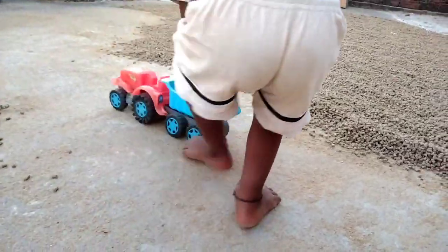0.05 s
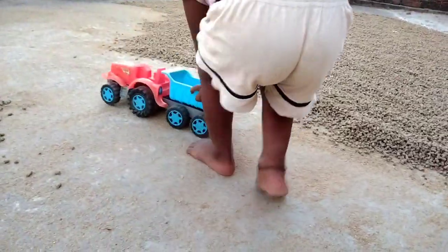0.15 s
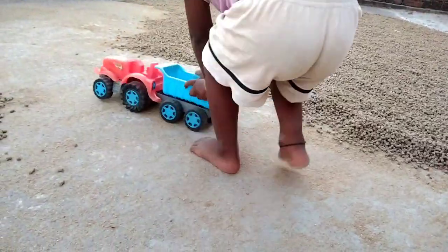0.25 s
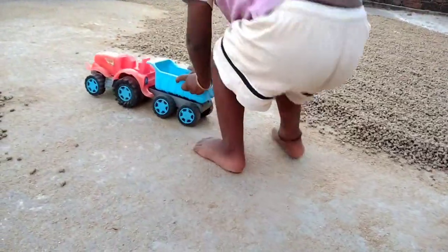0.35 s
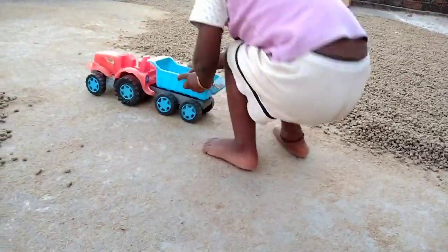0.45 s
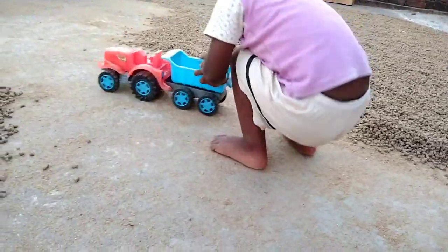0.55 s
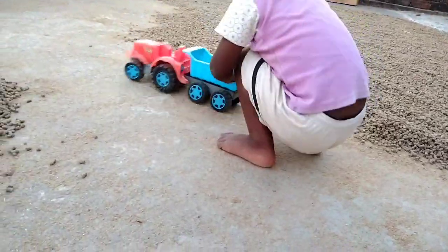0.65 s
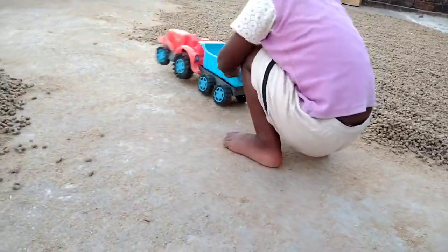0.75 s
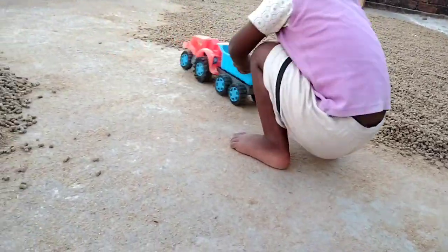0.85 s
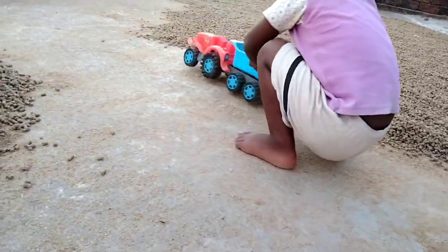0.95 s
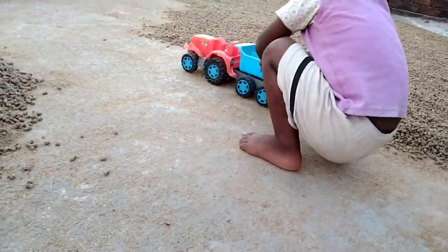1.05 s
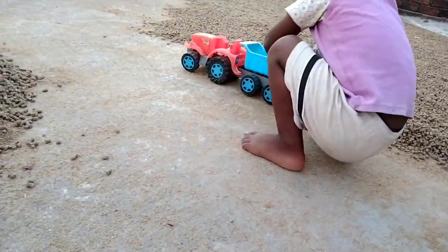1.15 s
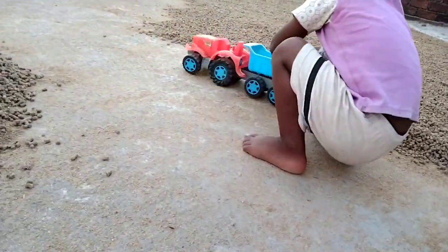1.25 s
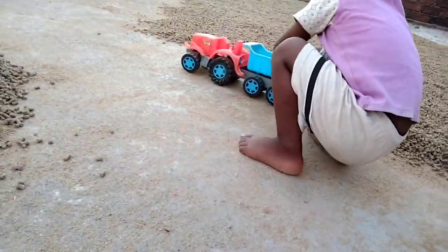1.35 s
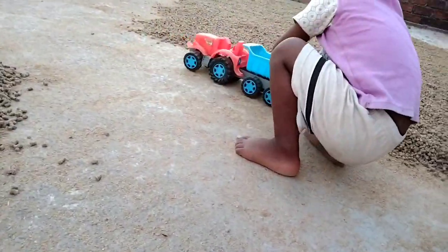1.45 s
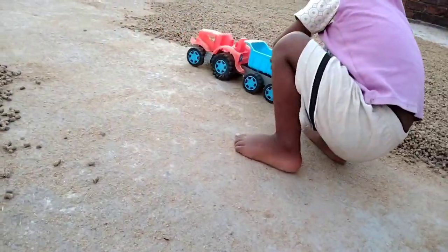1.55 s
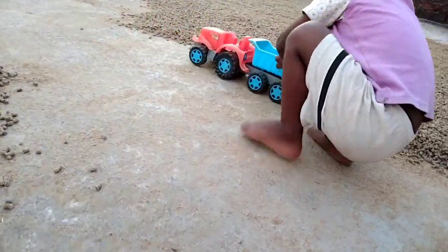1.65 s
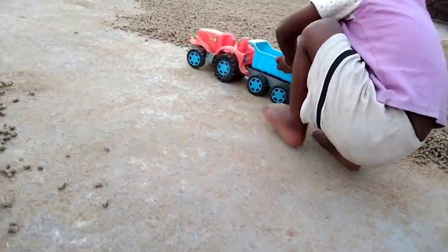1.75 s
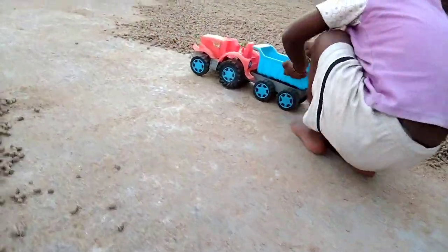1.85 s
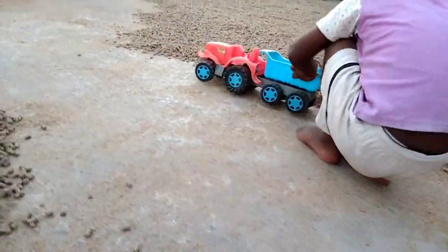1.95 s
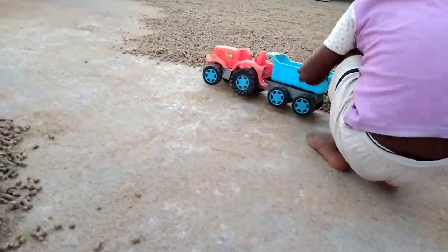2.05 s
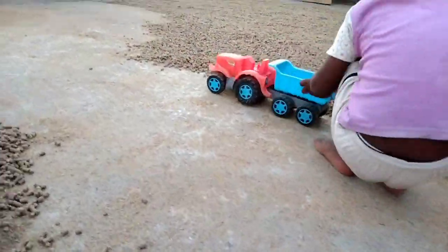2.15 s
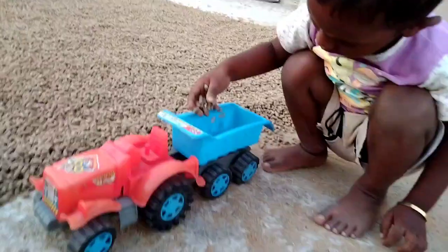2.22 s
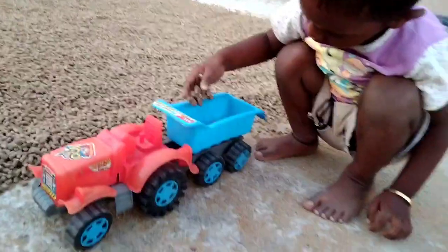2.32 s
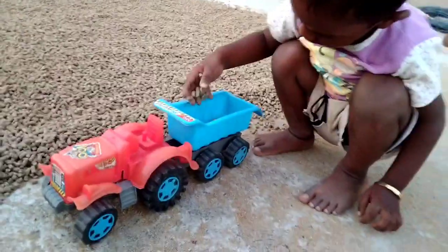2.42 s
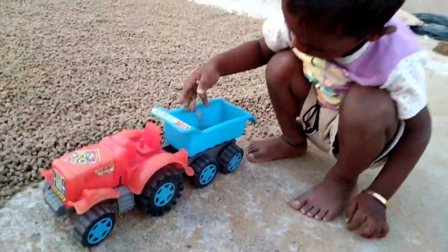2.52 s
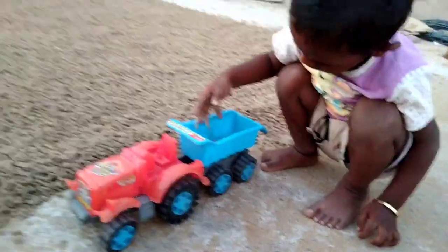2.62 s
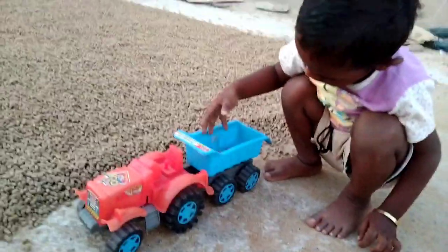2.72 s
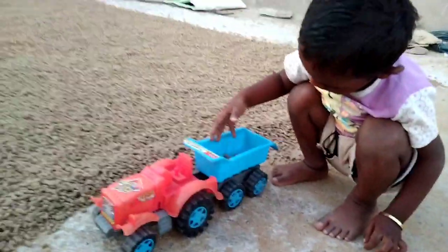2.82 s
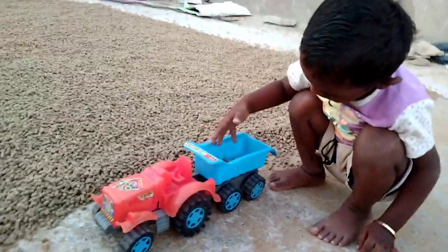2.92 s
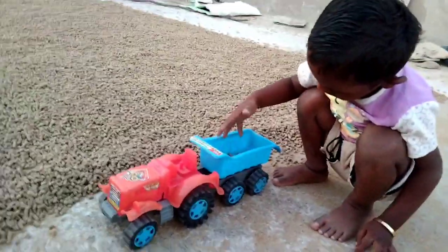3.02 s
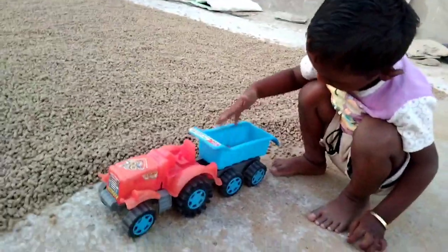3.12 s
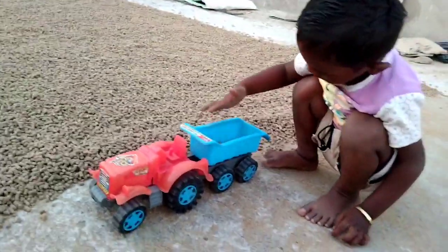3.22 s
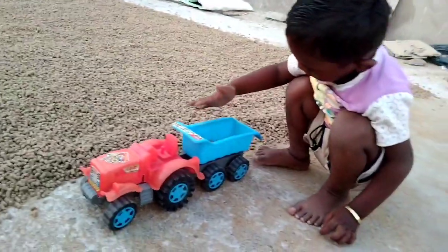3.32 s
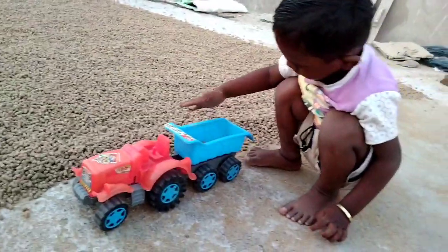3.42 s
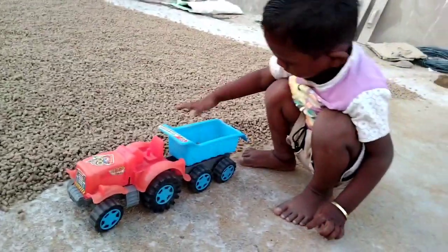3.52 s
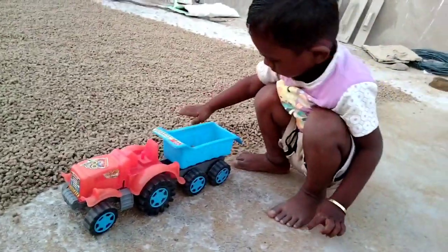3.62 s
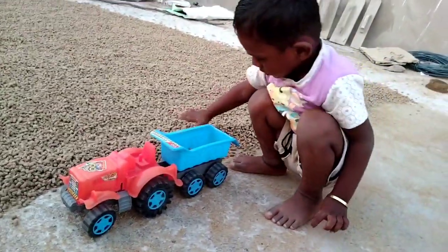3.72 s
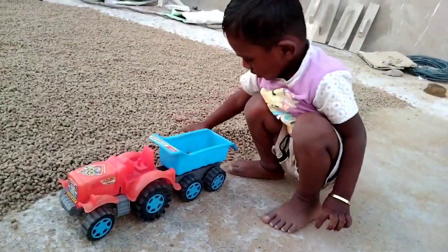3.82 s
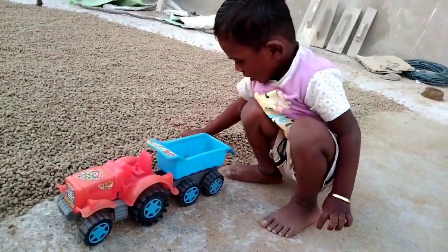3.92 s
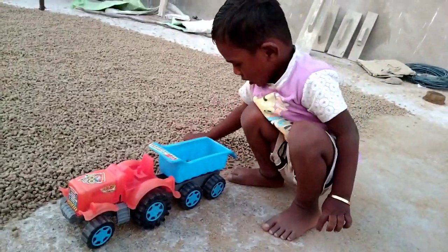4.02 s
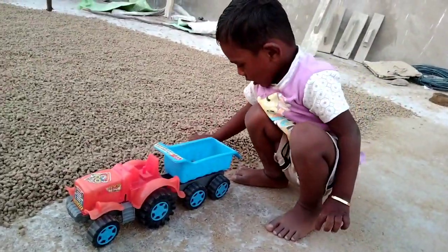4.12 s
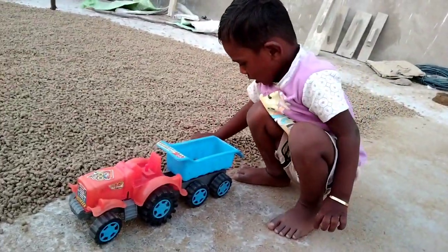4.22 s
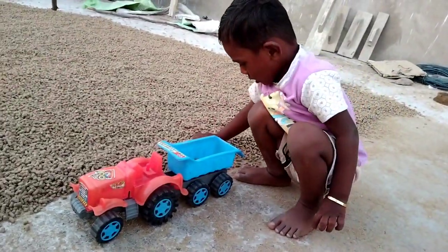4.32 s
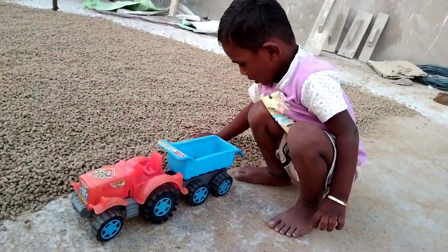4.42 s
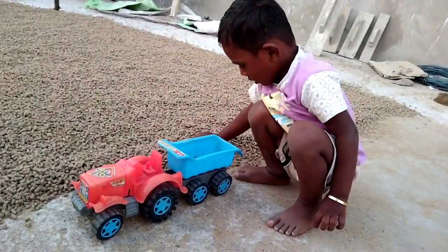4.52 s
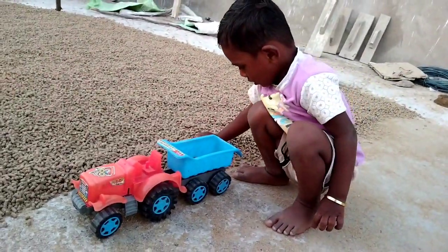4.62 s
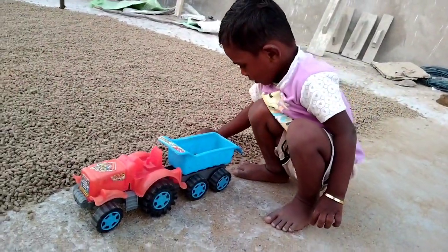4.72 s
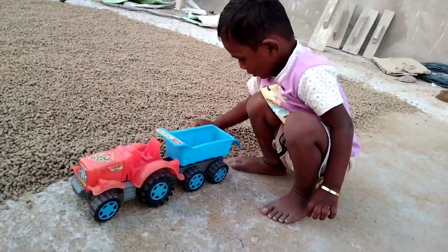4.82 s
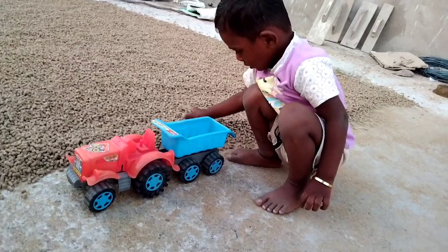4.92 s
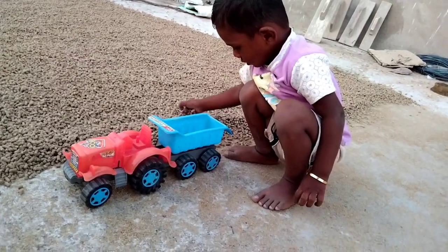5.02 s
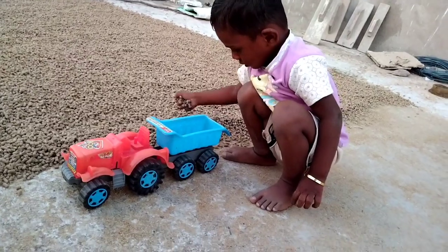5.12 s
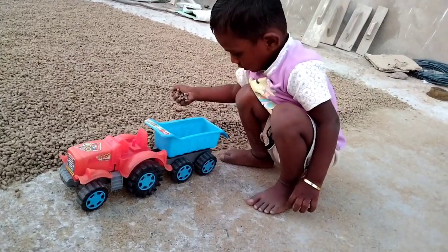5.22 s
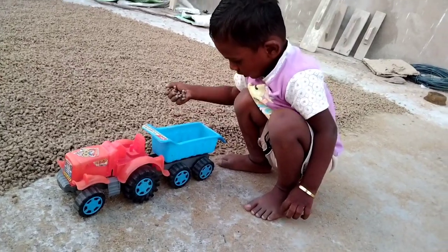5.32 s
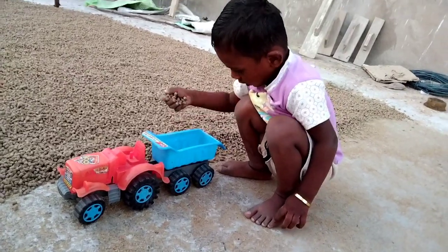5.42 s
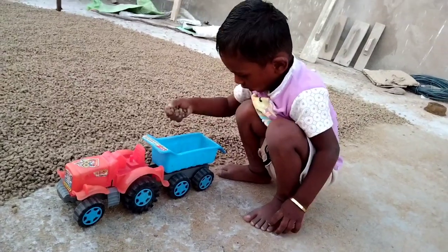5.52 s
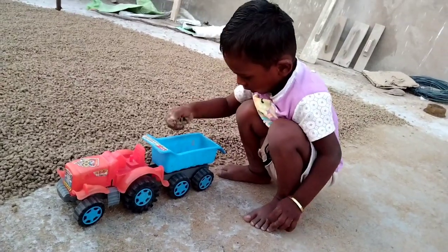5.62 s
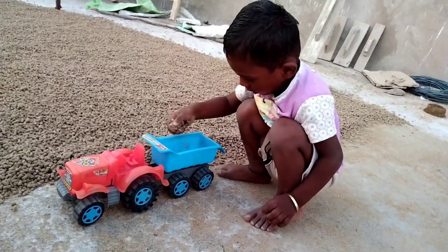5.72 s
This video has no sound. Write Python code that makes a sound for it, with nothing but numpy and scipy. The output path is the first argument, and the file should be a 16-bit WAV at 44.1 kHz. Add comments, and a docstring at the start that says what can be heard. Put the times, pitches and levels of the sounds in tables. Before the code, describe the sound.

In an open concrete yard, a plastic toy tractor and trailer rattles over grit in uneven pushes, jolts and scrapes to a halt. A dull bump leads into a dense clatter of hard pellets in the hollow trailer, thinning out. Faint hand rustling follows while chicks peep and a hen clucks far off; a few last pellets drop. Small mono microphone, close, short echo.

```python
"""First, a plastic toy tractor and trailer rattles over gritty concrete, jolts and knocks to a stop.
Hard pellets then drop into the hollow trailer; a hand rakes the heap and a few more pellets follow.
Toy and pellets are random or listed blows to a few shell modes, with stiff clicks and noisy cracks.
Chicks peep across the yard and a hen clucks far off, all as gliding tones; the yard is a short
decaying echo. One small microphone with a noise suppressor takes it in mono."""
import sys
import numpy as np
from scipy import signal
from scipy.fft import rfft, irfft
from scipy.io import wavfile
from scipy.ndimage import uniform_filter1d

SR = 44100
rng = np.random.default_rng(int(sys.argv[2]) if len(sys.argv) > 2 else 0)


def transcribe(signal):
    """Save signal, clipped to [-1, 1], as a 16-bit WAV file at the path in sys.argv[1]."""
    frames = np.atleast_2d(signal).T
    limited = np.clip(frames, -1, 1)
    pcm = np.round(limited * 32767).astype(np.int16)
    wavfile.write(sys.argv[1], SR, pcm)


N = 254016
TIME = np.arange(N) / SR

# Modes of the hollow plastic shell. Each row: nominal frequency in Hz, level in dB, t60 in s.
SHELL_MODES = [(272, -38.5, 0.004), (328, -40, 0.059), (430, -15, 0.012), (533, -13.5, 0.031),
               (674.6, -11, 0.04), (802, -1, 0.02), (950.4, 2, 0.033), (1073, 3, 0.025), (1300, 3.5, 0.028),
               (1467, 4, .025), (1706, 2.5, 0.018), (2120, -5.5, 0.0096), (2762, -6.5, 0.023),
               (3067, -4, 0.026), (3430, 0.5, 0.014), (3700, -0.5, 0.019), (4260, -1.5, 0.012),
               (4380, -1.5, 0.011)]
CLICK_FROM_HZ = 2000  # modes from here up make the stiff click, those below the ring
# Crack of a hard contact. Each row: frequency in Hz, level in dB.
CRACK_SPECTRUM = [(1500, -32), (4500, -4.5), (5700, 3), (7200, -1), (8500, -12), (10500, -24.5),
                  (13500, -24), (16000, -28)]
# Grit grinding under the wheels. Each row: frequency in Hz, level in dB.
GRIT_SPECTRUM = [(100, -11.5), (400, -12), (2000, 5), (5000, 1), (7000, 0.5), (8500, -11.5), (11000, -15.5),
                 (13300, -8), (15500, -13)]

# Pushes that set the toy rolling. Each row: start in seconds, end in seconds, level at the start in dB,
# level at the end in dB, grittiness in dB.
PUSHES = [(0, 0.145, -34, -34.5, 1.5), (0.142, 0.283, -34.5, -35.5, 3), (0.315, 0.396, -35, -42.5, 4),
          (0.42, 0.575, -39, -36.5, 2.5), (0.629, 0.764, -37.5, -35.5, -1), (0.854, .87, -43, -55, 2.5),
          (0.913, 0.933, -26.5, -37.5, -12.5), (0.997, 1.019, -46, -57, -1),
          (1.093, 1.217, -40.5, -51.5, -1.5), (1.224, 1.416, -54.5, -58.5, -21),
          (1.405, 1.445, -45.5, -43.5, -5), (1.452, 1.576, -40, -38.5, -5.5),
          (1.619, 1.673, -38, -41.5, -3.5), (1.717, 1.78, -49.5, -53.5, -6.5),
          (1.982, 2.1, -52.5, -53.5, -3.5), (2.114, 2.2, -40.5, -45, -5.5)]
PUSH_ATTACK_S, COAST_DB_PER_S = 0.0064, 178  # the rattle starts at once and dies as the toy coasts
# click and crack against the shell ring; grit brightens both
ROLL_CLICK_DB, ROLL_CRACK_DB, ROLL_CRACK_PER_GRIT = -8, -9, 0.57
# Low thrum of the hollow wheels. Each row: frequency in Hz, level in dB.
THRUM_SPECTRUM = [(40, -19.5), (90, -4), (200, -5), (330, -1.5), (520, 5.5), (750, -3), (3000, -66.5)]

# A wheel jumps over a larger grain. Each row: start in seconds, level in dB,
# hardness (click over ring) in dB.
GRAIN_JUMPS = [(0.0502, -38, 0), (0.0704, -31, -6), (.117, -31.5, -5), (0.1294, -32.5, 1),
               (0.243, -29.5, 8), (0.248, -33.5, -4), (0.2732, -32.5, 4), (0.3409, -33.5, 5),
               (0.4748, -29, 1), (.5845, -40, -21), (0.6373, -28, -9.5), (0.701, -30, -8),
               (0.7503, -31, -4.5), (0.7627, -28.5, -1), (0.7873, -32.5, -5.5), (.8884, -49.5, 8),
               (1.0397, -52, -1), (1.2337, -47, -13), (1.4636, -33.5, -9.5), (1.4744, -33.5, -1),
               (1.515, -53, 3), (1.5389, -32.5, -6), (1.6449, -39.5, -1), (1.9824, -51, -14),
               (2.1509, -44.5, 2)]
JUMP_CRACK_DB, JUMP_SOFT_DB = -15.5, 6  # crack against the blow; softness in dB per octave

# The whole toy jolts on the concrete. Each row: start in seconds, level in dB before the common
# knock gain, softness in dB per octave.
JOLTS = [(0.9172, -36.5, 4), (0.9207, -32, 17), (0.9231, -27, 17), (.9441, -38.5, 23), (1.1066, -41, 16.5),
         (2.1053, -40, 13), (4.762, -68, 7.5)]
JOLT_HARD_DB, JOLT_CRACK_DB = -8, -14.5  # click over ring; crack against the blow

# Chicks across the yard, one row a peep. Each row: start in seconds, length in seconds, top pitch in Hz,
# end pitch in Hz, level in dB before the common peep gain, all harmonics but the second in dB.
PEEP_NOTES = [(1.178, .028, 1780, 1656, -44, 0), (1.208, 0.023, 1750, 1574, -39, -3),
              (1.23, 0.059, 1610, 1524, -44.5, -3), (1.287, 0.084, 1580, 1510, -58.5, -11),
              (1.679, .09, 1760, 1470, -54, -4), (1.98, 0.1, 1750, 1587, -56, -1.5),
              (2.04, 0.053, 1760, 1590, -56.5, -1), (2.06, 0.049, 1690, 1580, -58, -1.5),
              (2.939, 0.097, 1482, 1383, -58, 2), (3.04, 0.035, 1520, 1410, -55.5, 6.5),
              (3.102, 0.0388, 1520, 1340, -69, 7), (3.191, 0.081, 1485, 1475, -69, 7.5),
              (3.31, 0.062, 1735, 1493, -51.5, 0.5), (3.447, 0.029, 1590, 1430, -58, -5),
              (3.873, 0.071, 1790, 1510, -56, 3), (3.949, 0.031, 1780, 1417, -53.5, -2.5),
              (3.979, 0.051, 1700, 1480, -51, -7), (4.025, 0.062, 1530, 1430, -52, -18),
              (4.077, .055, 1733, 1543, -52.5, -1), (4.118, .043, 1582, 1370, -52.5, 1),
              (4.205, 0.017, 1546, 1440, -54.5, -11), (4.241, .038, 1805, 1560, -55.5, -5),
              (4.409, 0.034, 1866, 1695, -58.5, 3.5), (4.439, 0.056, 1725, 1650, -47.5, -14),
              (4.516, 0.032, 1667, 1657, -45.5, -11.5), (4.527, 0.064, 1700, 1287, -49.5, 4),
              (4.591, 0.026, 1673, 1600, -52.5, -6.5), (4.629, 0.02, 1675, 1505, -53.5, -1),
              (5.14, 0.072, 1715, 1562, -51.5, 5), (5.204, .033, 1883, 1616, -43.5, -3),
              (5.205, 0.065, 1520, 1414, -55.5, 1.5), (5.285, .075, 1547, 1462, -52.5, 1.5),
              (5.323, 0.071, 1805, 1355, -44, 0.5), (5.399, 0.041, 1560, 1412, -54, 5)]
# Level of the first to fourth harmonic of a peep in dB.
HARMONICS_DB = [-14, -0.5, -14, -28]
# a peep bulges before it drops: a share of the drop, plus a fixed part
PEEP_ARCH, PEEP_BULGE_HZ = 0.2, 18

# Dry scrapes of grit, under a bare foot and between the fingers. Each row: start in seconds,
# end in seconds, level in dB.
GRIT_SCRAPES = [(1.8, 1.881, -46), (1.895, 1.96, -58.5), (2.541, 2.777, -50.5)]
SCRAPE_ATTACK_S, SCRAPE_FADE_DB_PER_S = 0.04, 157.5
# Hiss of those scrapes. Each row: frequency in Hz, level in dB.
SCRAPE_SPECTRUM = [(200, -7.5), (900, 4), (2200, -2), (4000, 4.5), (6500, -5.5), (9000, -11), (11000, -16),
                   (14000, -10), (15700, -16)]

# A dull bump against the trailer. Each row: start in seconds, peak of the push in dB.
TRAILER_BUMPS = [(2.103, -14)]

# Pellets land in the trailer, ringing on the floor or clicking on a stiff edge. Each row: start in
# seconds, level in dB, hardness (click over ring) in dB, crack in dB before the common crack gain.
LANDINGS = [(2.2054, -34, -5, -19.5), (2.2085, -20, -3, -18), (2.2318, -27.5, -5.5, -8.5),
            (2.2637, -26, 3.5, -24), (2.2698, -20.5, -3, -16.5), (2.29, -23.5, 0, -12),
            (2.307, -39.5, -8, -17), (2.322, -23, 6, -26), (2.3327, -40.5, -5.5, -10),
            (2.3482, -19, -2, -11), (2.3521, -30.5, -0.5, -21), (2.3593, -27, 8, -19),
            (2.3678, -26.5, -3.5, -13), (2.4073, -30.5, 7.5, -24), (2.4125, -39, 5, -22),
            (2.4497, -38.5, -5.5, -44), (2.52, -34, 2, -9), (2.582, -37, 4, -8.5), (2.602, -26, -0.5, -15),
            (2.615, -24.5, -1.5, -16.5), (2.623, -30.5, -1, -12), (2.6567, -31, -8, -19),
            (2.6975, -33.5, -10, -11), (2.7108, -33.5, -5, -29), (2.7207, -32, -11, -15),
            (2.7455, -40, -15, -4.5), (2.7643, -23, 8, -9), (2.7778, -33.5, -1.5, -18),
            (2.7876, -40, -11, -7), (2.8013, -33, -12, -27), (2.8327, -30, -1.5, -38),
            (2.8522, -41.5, -11, -24), (2.8587, -30, -9, -27), (2.8705, -40, -16, -23),
            (2.9247, -38, 1, -44), (2.9807, -53.5, -17, -32), (3.0158, -43, -1, -3), (3.082, -55, -10, -12),
            (3.1171, -51.5, 1.5, -6), (3.245, -60.5, -19, 2), (5.5675, -49.5, 17.5, 12),
            (5.5864, -40.5, -1, -14), (5.711, -30.5, -3.5, -22.5), (5.7305, -28, -2, -33),
            (5.7552, -49, 5, -13)]
PELLET_SOFT_DB = 1  # softness in dB per octave
# hopping after a landing of LANDING_DB, dB per dB of a stronger one, and how fast it settles
HOP_DB, HOP_FOLLOW, SETTLE_DB_PER_S, LANDING_DB = -43.5, 0.55, 171, -30

# Strokes of the hand in the heap, a faint hollow rustle. Each row: start in seconds, end in seconds,
# level in dB.
HAND_STROKES = [(2.893, 3.27, -64.5), (3.69, 4.0, -77), (4.249, 4.589, -65), (4.765, 4.852, -72.5),
                (5.2, 5.501, -83)]
STROKE_ATTACK_S, STROKE_FADE_DB_PER_S = 0.014, 125
# Resonances of the heap. Each row: frequency in Hz, width in Hz, level in dB.
HEAP_MODES = [(847, 57, 0.5), (1028, 117, -3), (1395, 96, 4.5), (1864, 64, -8), (2254, 130, -5.5),
              (3440, 100, -17), (4130, 460, -9)]

# Far hen. Each row: start in seconds, length in seconds, starting pitch in Hz, level in dB.
HEN_CLUCKS = [(3.62, 0.075, 469, -76.5), (3.91, 0.17, 402, -69), (4.391, 0.16, 494, -67),
              (4.801, 0.131, 409, -64.5), (5.14, 0.15, 410.4, -66.5)]
# Faint chicks further off. Each row: start in seconds, length in seconds, start pitch in Hz,
# end pitch in Hz, level in dB.
DISTANT_PEEPS = [(3.638, 0.074, 4015, 3940, -71), (3.712, 0.065, 3720, 3420, -65),
                 (3.737, 0.087, 5330, 5980, -78.5), (3.801, 0.2, 2690, 2320, -71.5),
                 (4.773, 0.067, 3480, 3367, -68), (4.873, 0.024, 2440, 2300, -69.5),
                 (4.968, 0.045, 3150, 3050, -74), (5.089, 0.051, 3580, 3466, -71)]
# A short yelp of the fowl. Each row: start in seconds, length in seconds, start pitch in Hz,
# end pitch in Hz, arch in Hz, level in dB.
FOWL_YELPS = [(5.426, 0.0326, 882, 1080, -21.5, -56)]

# Distant rumble and faint hiss. Each row: frequency in Hz, level in dB.
AIR_SPECTRUM = [(25, 5.5), (50, -16), (90, 3), (190, -0.5), (260, -8.5), (400, -23), (600, -30.5),
                (2000, -34.5), (3300, -31.5), (5500, -37.5), (15700, -43)]
AIR_DB = -59.5
# Decay of the yard echo. Each row: frequency in Hz, t60 in s.
YARD_DECAY = [(200, 0.38), (1000, 0.22), (3500, 0.28), (8000, 0.14), (15000, 0.23)]
WALL_S, WALL_DB = 0.026, -22  # the far wall returns each bird note once
EDGE_HZ = 15650  # upper band limit


def amp(db):
    """Decibels to gain."""
    return 10 ** (np.asarray(db) / 20)


def unit(x):
    """Scales to rms 1."""
    return x / np.sqrt(np.mean(x ** 2) + 1e-30)


def read(points, hz):
    """Reads a spectrum on a log-frequency axis."""
    f, value = np.transpose(points)
    return np.interp(np.log(hz + 1), np.log(f + 1), value)


def add(mix, s, sound):
    """Mixes a sound in at time s."""
    part = mix[max(round(s * SR), 0):][:len(sound)]
    part += sound[:len(part)]


def noise(spectrum, size):
    """Coloured noise of rms 1."""
    gain = amp(read(spectrum, np.fft.rfftfreq(size, 1 / SR)))
    return unit(irfft(rfft(rng.standard_normal(size)) * gain, size))


def drift(per_s, size):
    """Smooth random wander."""
    return np.interp(np.arange(size) * per_s / SR, np.arange(size), rng.standard_normal(size))


def gesture(start, end, attack_s, fade_db_per_s):
    """Gain of one movement: attack, hold, release."""
    attack = np.clip((TIME - start) / attack_s, 0, 1)
    return attack * amp(-fade_db_per_s * np.maximum(TIME - end, 0))


def contact(soft_db, crack_spectrum, crack_s, soft_hz=520, size=3000):
    """One strike as shell ring, stiff click and contact crack, each with the energy of rms 1 over 5 ms."""
    t = np.arange(size) / SR
    hz, db, t60 = np.transpose(SHELL_MODES)[:, :, None]
    low = hz[:, 0] < CLICK_FROM_HZ
    # the spot that is struck decides how much each mode takes, and in which sense
    share, detune, turn = rng.standard_normal((3, len(SHELL_MODES), 1))
    decay = amp(db + 3.2 * share - 60 * t / t60)
    modes = decay * np.sin(2 * np.pi * (hz * (1 + 0.031 * detune) * t + turn))
    # a soft blow cannot excite the higher modes
    softening = amp(-soft_db * np.log2(np.maximum(hz / soft_hz, 1)))
    ring = (modes * softening)[low].sum(0) * (1 - np.exp(-(t / 0.001) ** 2))
    click = modes[~low].sum(0) * (1 - np.exp(-(t / 0.00012) ** 2))
    # every grain cracks with a colour of its own
    colour = [(f, level + 8.0 * rng.standard_normal()) for f, level in crack_spectrum]
    crack = noise(colour, size) * np.exp(-t / crack_s) * (1 - np.exp(-t / 0.0009))
    return np.array([unit(ring), unit(click), unit(crack)]) * np.sqrt(220 / size)


def blow(db, hard_db, crack_db, soft_db, crack_s):
    """A harder contact trades shell ring for click."""
    levels_db = db + np.array([-hard_db / 2, hard_db / 2, crack_db])
    return amp(levels_db) @ contact(soft_db, CRACK_SPECTRUM, crack_s)


def pushing():
    """Gains of shell ring, click and crack as one push follows another."""
    gains = np.zeros((3, N))
    for start, end, first_db, last_db, grit_db in PUSHES:
        level = amp(np.interp(TIME, [start, end], [first_db, last_db]))
        effort = gesture(start, end, PUSH_ATTACK_S, COAST_DB_PER_S) * level
        colour = amp([0, ROLL_CLICK_DB + grit_db, ROLL_CRACK_DB + ROLL_CRACK_PER_GRIT * grit_db])
        gains = np.maximum(gains, np.outer(colour, effort))
    return gains


def rattle(per_s=650, spread_db=4.0, soft_db=7.0, clump_db=7.0, clumps_per_s=55, thrum_db=-10,
           ring_db=-1.85, spots=28):
    """Lugged wheels crush grit: random strikes into the shell, each spot of it struck in short clumps."""
    parts = np.zeros((3, N))
    for _ in range(spots):
        spread = spread_db * np.minimum(rng.exponential(1, N), 3)
        clumps = clump_db * np.tanh(drift(clumps_per_s, N))
        train = amp(spread + clumps) * (rng.random(N) < per_s / spots / SR)
        parts += signal.oaconvolve(train[None], contact(soft_db, GRIT_SPECTRUM, 0.002), axes=1)[:, :N]
    # level each part over 41 ms, so that the pushes set the loudness
    parts /= np.sqrt(uniform_filter1d(parts ** 2, size=1800, axis=1) + 1e-9)
    ring, click, crack = pushing()
    # the hollow wheels thrum under the rattle
    lugs = amp(5.1 * drift(90, N))  # the tread meets the ground unevenly
    thrum = amp(thrum_db) * lugs * noise(THRUM_SPECTRUM, N)
    return ring * (thrum + amp(ring_db) * parts[0]) + click * parts[1] + crack * parts[2]


def jumps():
    """A wheel drops off each larger grain and strikes the shell."""
    out = np.zeros(N)
    for s, db, hard_db in GRAIN_JUMPS:
        add(out, s, blow(db, hard_db, JUMP_CRACK_DB, JUMP_SOFT_DB, 0.0015))
    return out


def knocks(knock_db=3.5):
    """The whole toy jolts on the ground: soft blows with a longer crack."""
    out = np.zeros(N)
    for s, db, soft_db in JOLTS:
        add(out, s, blow(db + knock_db, JOLT_HARD_DB, JOLT_CRACK_DB, soft_db, 0.0075))
    return out


def glide(length, start_hz, end_hz, arch_hz, waver, hook=0, hook_s=0.0085, edge_s=0.007):
    """Phase and envelope of one bird note: a glide with an arch, and a hook up to pitch if asked for."""
    t = np.arange(round(length * SR)) / SR
    u = t / length
    hz = start_hz + (end_hz - start_hz) * u + 4 * arch_hz * u * (1 - u)
    hz = hz * (1 - hook * np.exp(-(t / hook_s) ** 2))
    hz = hz * (1 + waver * drift(300, len(u)))
    swell = np.tanh(t / edge_s) * np.tanh((length - t) / edge_s)
    return 2 * np.pi * np.cumsum(hz) / SR, swell * amp(2.6 * drift(100, len(u)))


def peeps(peep_db=2.5, waver=0.011, hook=0.09, vary_db=2.0):
    """Chicks across the yard: hooked, falling notes with a strong second harmonic."""
    out = np.zeros(N)
    for s, length, top, end, db, others_db in PEEP_NOTES:
        arch_hz = PEEP_ARCH * (top - end) + PEEP_BULGE_HZ
        phase, swell = glide(length, top, end, arch_hz, waver, hook)
        voice = np.zeros(len(phase))
        for k, harmonic_db in enumerate(HARMONICS_DB, 1):
            # the weaker harmonics come and go within a note
            change_db = 0 if k == 2 else others_db + vary_db * drift(45, len(phase))
            voice += amp(harmonic_db + change_db) * np.sin(k * phase)
        add(out, s, amp(db + peep_db) * swell * voice)
    return out


def scrapes(grain_db=3.0, grains_per_s=400):
    """Fine grit slips in many tiny catches."""
    effort = sum(amp(db) * gesture(start, end, SCRAPE_ATTACK_S, SCRAPE_FADE_DB_PER_S)
                 for start, end, db in GRIT_SCRAPES)
    return effort * unit(noise(SCRAPE_SPECTRUM, N) * amp(grain_db * drift(grains_per_s, N)))


def bump(push_s=0.00031, edge_s=0.00009, thud_hz=90, thud_db=-28, thud_s=0.02):
    """A soft blow pushes the wall of the trailer once, and the toy thuds on its wheels."""
    out, t = np.zeros(N), np.arange(SR // 10) / SR
    push = (1 - t / push_s) * np.exp(-t / push_s) * (1 - np.exp(-(t / edge_s) ** 2))
    thud = amp(thud_db) * np.sin(2 * np.pi * thud_hz * t) * np.exp(-t / thud_s)
    for s, db in TRAILER_BUMPS:
        add(out, s, amp(db) * (push / push.max() + thud))
    return out


def pellets(crack_db=2.0):
    """Hard pellets strike the hollow trailer and excite its shell."""
    out = np.zeros(N)
    for s, db, hard_db, pellet_crack_db in LANDINGS:
        add(out, s, blow(db, hard_db, pellet_crack_db + crack_db, PELLET_SOFT_DB, 0.0017))
    return out


def skitter(per_s=350, spread_db=0.0, click_db=-7, crack_db=-19, rise_s=0.0099, spots=12):
    """Dropped pellets hop and roll on the trailer floor until they settle: dense random small strikes."""
    out = np.zeros(N)
    for _ in range(spots):
        sizes = amp(spread_db * np.minimum(rng.exponential(1, N), 3))
        train = sizes * (rng.random(N) < per_s / spots / SR)
        strike = amp([0, click_db, crack_db]) @ contact(0, GRIT_SPECTRUM, 0.0014)
        out += signal.oaconvolve(train, strike)[:N]
    stir = np.zeros(N)
    for s, db, *_ in LANDINGS:
        hop = amp(HOP_DB + HOP_FOLLOW * (db - LANDING_DB))
        stir = np.maximum(stir, hop * gesture(s, s, rise_s, SETTLE_DB_PER_S))
    return stir * unit(out)


def rake(valley_db=-34):
    """Uneven friction of the hand, heard through a few hollow resonances of the heap."""
    f = np.fft.rfftfreq(N, 1 / SR)
    body = sum(amp(db) / (1 + ((f - hz) / width) ** 2) ** 2 for hz, width, db in HEAP_MODES)
    body += amp(valley_db) / (1 + (f / 5000) ** 2)  # fills the valleys between resonances
    friction = rng.standard_normal(N) * amp(2 * drift(120, N))
    effort = sum(amp(db) * gesture(start, end, STROKE_ATTACK_S, STROKE_FADE_DB_PER_S)
                 for start, end, db in HAND_STROKES)
    return effort * unit(irfft(rfft(friction) * body, N))


def clucks():
    """A hen far off: low tones, roughened by a fast waver of pitch and falling slightly."""
    out = np.zeros(N)
    for s, length, hz, db in HEN_CLUCKS:
        phase, swell = glide(length, hz, hz * 0.92, 3.6, 0.086)
        add(out, s, amp(db) * swell * unit(np.sin(phase)))
    return out


def far_peeps():
    """Faint chicks further off: single gliding tones."""
    out = np.zeros(N)
    for s, length, start, end, db in DISTANT_PEEPS:
        phase, swell = glide(length, start, end, 31.7, 0.016)
        add(out, s, amp(db) * swell * np.sin(phase))
    return out


def yelps():
    """A short yelp of the fowl: one tone gliding with a wavering pitch."""
    out = np.zeros(N)
    for s, length, start, end, arch, db in FOWL_YELPS:
        phase, swell = glide(length, start, end, arch, 0.044)
        add(out, s, amp(db) * swell * unit(np.sin(phase)))
    return out


def yard(x, size=24000):
    """Sparse reflections from ground and walls, each band dying at its own rate."""
    taps = rng.standard_normal(size) * (rng.random(size) < 0.08)
    taps *= np.arange(size) > 0.004 * SR  # the first reflection needs 4 ms
    hz, t, z = signal.stft(taps, SR, nperseg=256)
    decay = amp(-60 * t / read(YARD_DECAY, hz)[:, None])
    tail = signal.istft(z * decay, SR, nperseg=256)[1]
    return signal.fftconvolve(x, tail / np.linalg.norm(tail))[:N]


def suppress(x, threshold_db=-85, depth_db=-7):
    """Noise suppressor: whatever lies under the threshold is turned down, band by band."""
    z = signal.stft(x, nperseg=512, noverlap=384)[2]
    power = uniform_filter1d(abs(z) ** 2, size=5, axis=-1)
    quiet = 1 / (1 + (power / amp(threshold_db) ** 2) ** 2)
    return signal.istft(z * amp(depth_db * quiet), nperseg=512, noverlap=384)[1][:, :N]


def scene(hit_wet_db=-20, roll_wet_db=-10, bird_wet_db=-8.5):
    """The rolling toy is further off and wetter than the hits; birds echo off a wall; rumble lies under all."""
    near = jumps() + knocks() + scrapes() + bump() + pellets() + skitter()
    rolling = amp(1.0) * rattle()
    birds = peeps() + clucks() + far_peeps() + yelps()
    echo = yard(amp(hit_wet_db) * near + amp(roll_wet_db) * rolling)
    echo += amp(bird_wet_db) * yard(birds)
    add(echo, WALL_S, amp(WALL_DB) * birds)
    air = amp(AIR_DB) * noise(AIR_SPECTRUM, N)
    return (near + rolling + birds + echo + rake() + air)[None]


def record(dry, low_cut_hz=70):
    """Faint noise is suppressed, the small microphone loses the deep bass; then the band limit."""
    low_cut = signal.butter(3, low_cut_hz, "highpass", fs=SR, output="sos")
    thin = signal.sosfilt(low_cut, suppress(dry))
    band_limit = signal.firwin(511, EDGE_HZ, window=("kaiser", 9), fs=SR)
    return signal.oaconvolve(thin, band_limit[None], "same")


dry = scene()
out = record(dry)
transcribe(out)
```